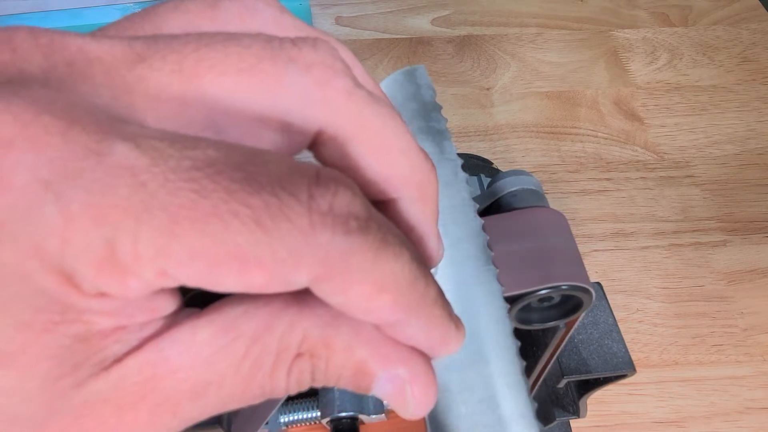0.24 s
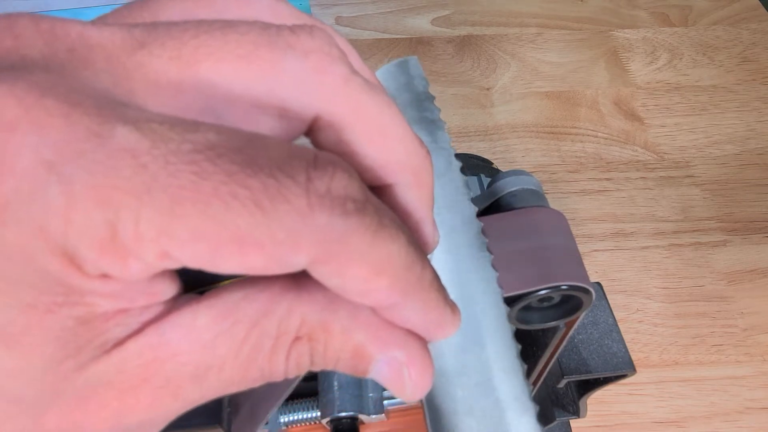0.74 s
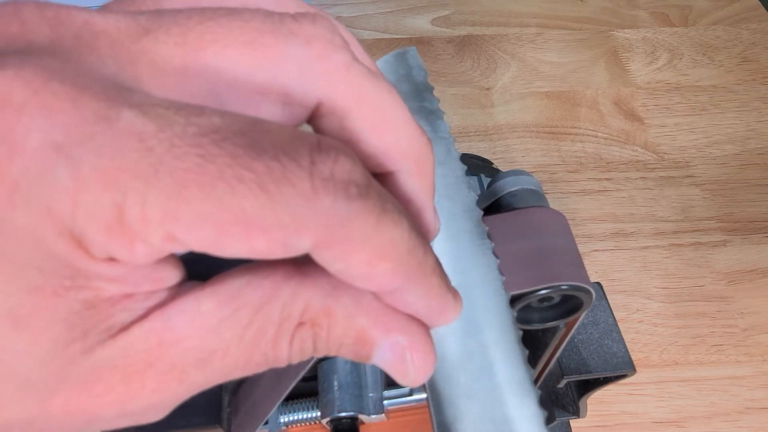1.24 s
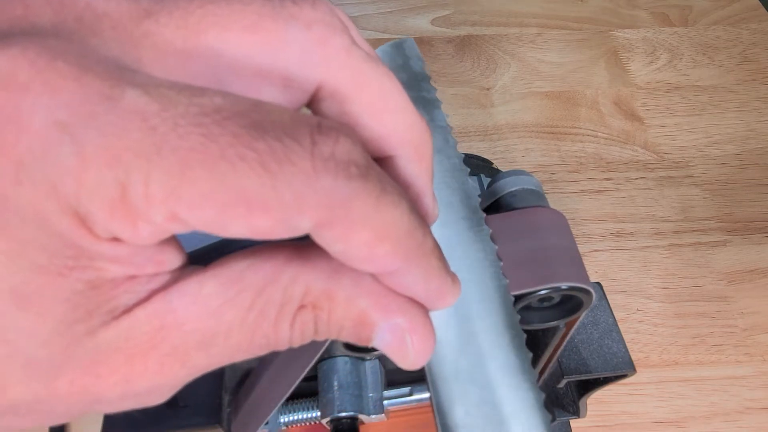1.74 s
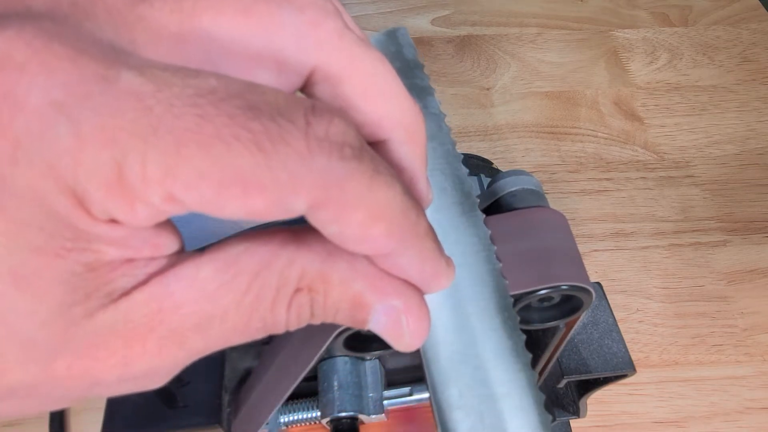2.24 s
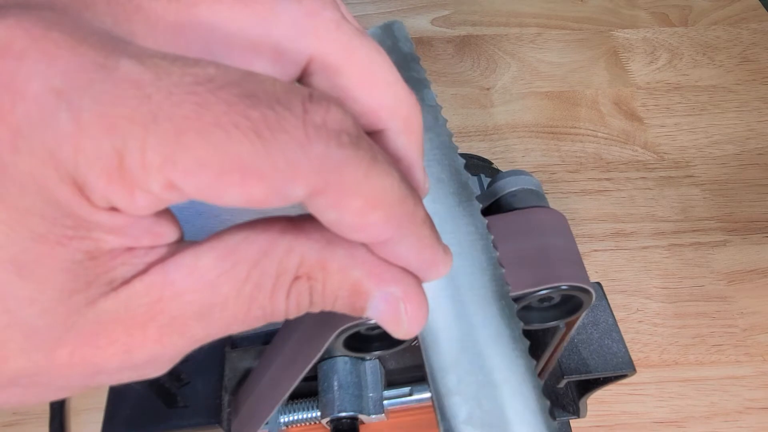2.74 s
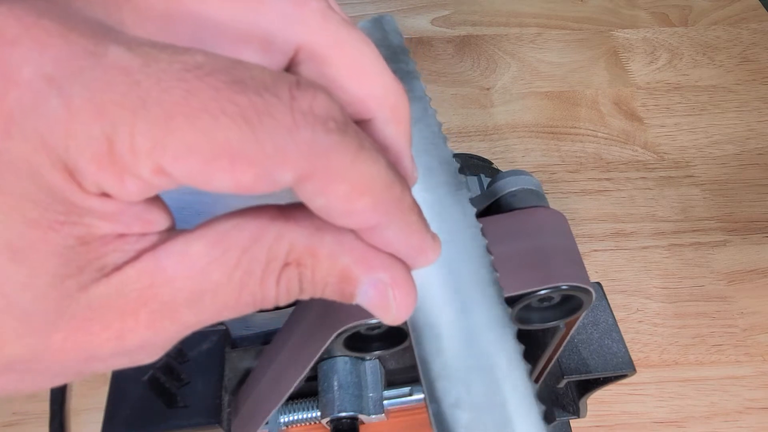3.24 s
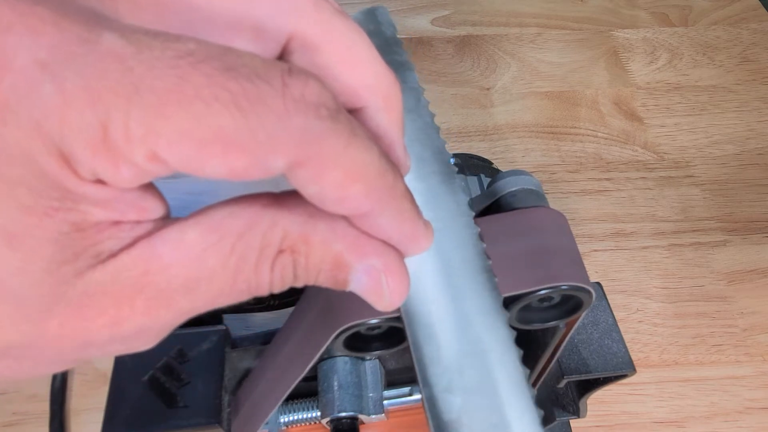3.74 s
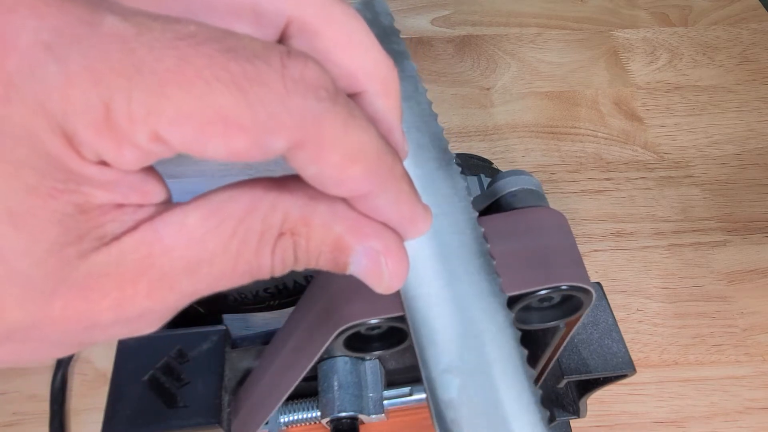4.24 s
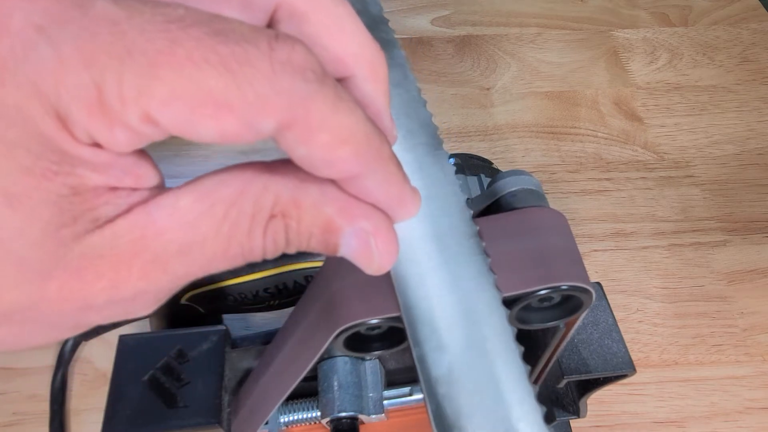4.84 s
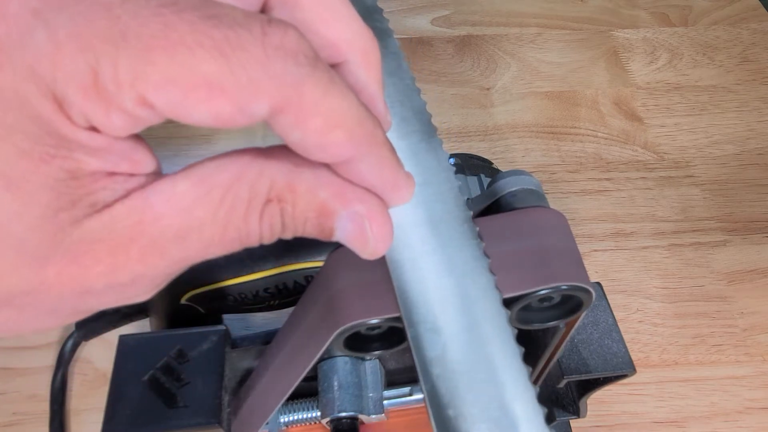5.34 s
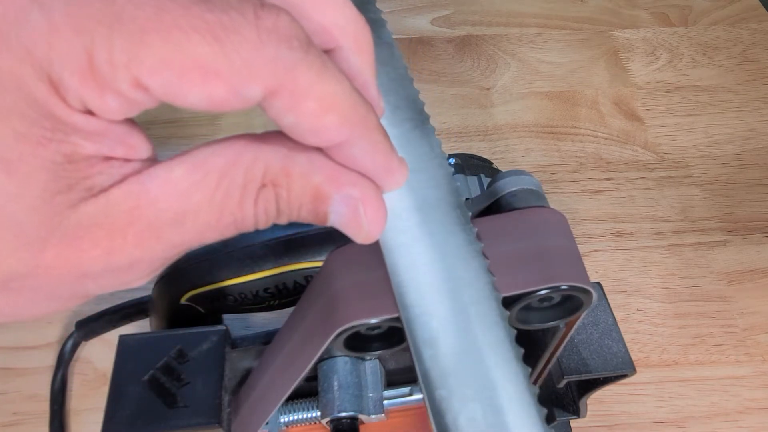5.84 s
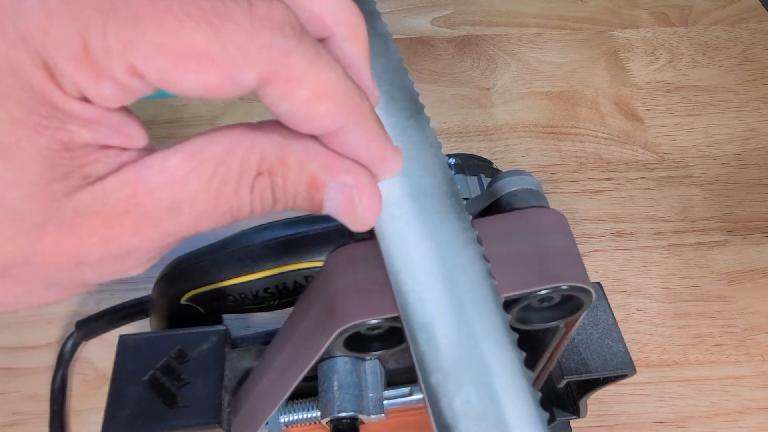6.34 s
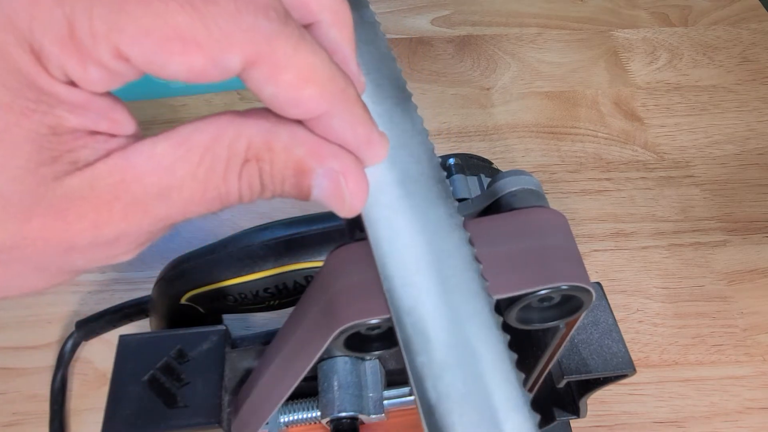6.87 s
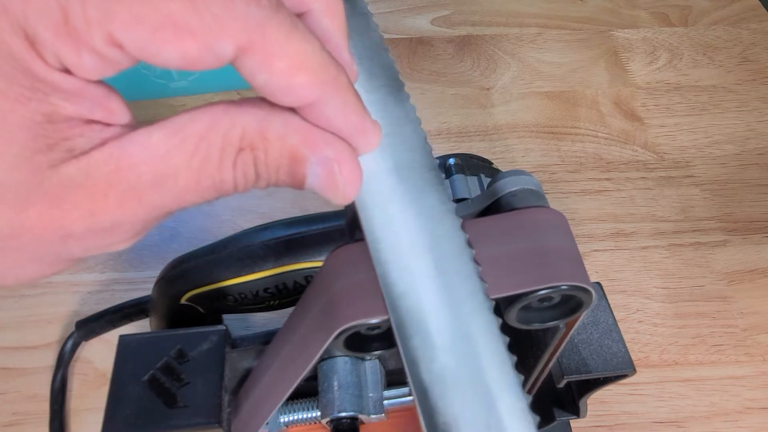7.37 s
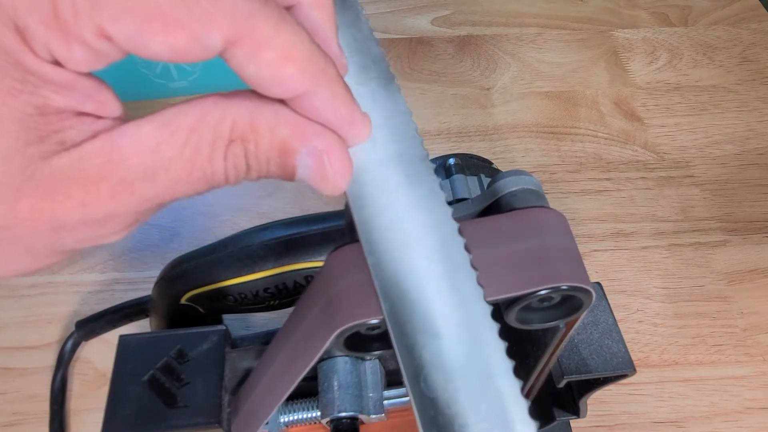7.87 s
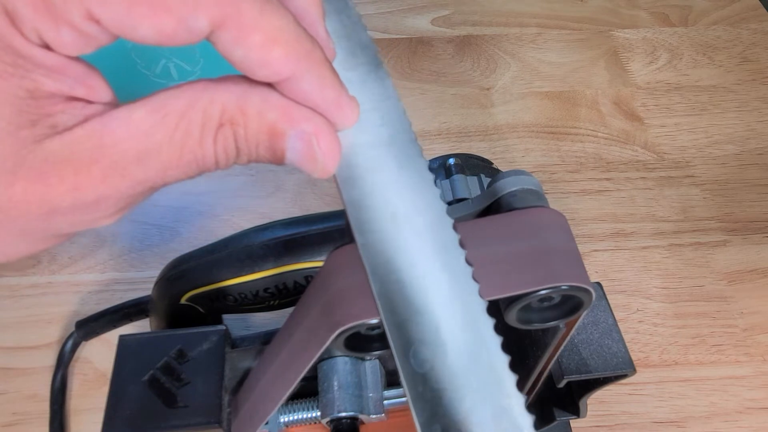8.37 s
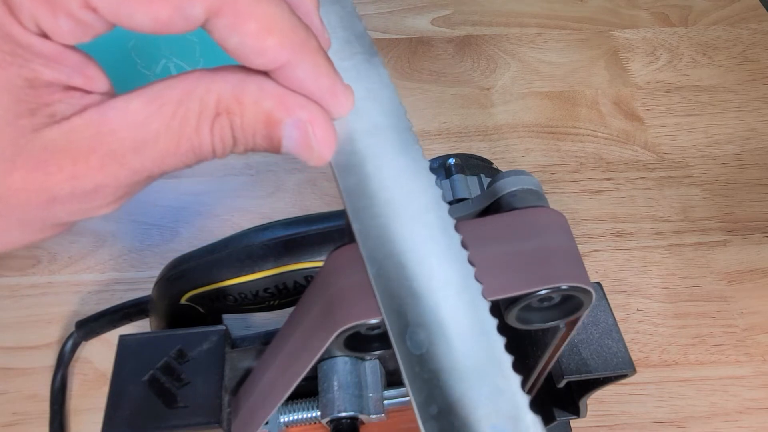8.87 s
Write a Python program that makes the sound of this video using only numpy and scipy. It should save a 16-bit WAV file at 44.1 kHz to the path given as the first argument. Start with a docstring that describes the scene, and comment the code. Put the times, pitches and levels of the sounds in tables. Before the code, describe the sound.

Close, gritty metal grinding pulses about twice a second, hissing and scraping above the constant hum, rush and rumble of a small sander.

```python
"""A serrated knife is drawn over the narrow belt of a small sander on a wooden bench, close to the left microphone.
From the start the motor hums, the frame rings, rollers and air rush, and the belt rumbles and is plucked every lap.
Grit rakes the blade from the first bite to the last: at each serration hiss swells first, then scrape, then flex.
Bright ticks of coarse grains come mostly in the first three seconds; the ringing pitches change as the contact
travels along the edge, and in the last two seconds the low flex is weaker. The right microphone lies in shadow."""
import sys
import numpy as np
from scipy import signal
from scipy.fft import rfft, irfft, next_fast_len
from scipy.io import wavfile
from scipy.ndimage import uniform_filter1d

SR = 44100
rng = np.random.default_rng(int(sys.argv[2]) if len(sys.argv) > 2 else 0)


def waveform_to_disk(signal):
    """Save audio, clipped to [-1, 1], as 16-bit WAV at the path in sys.argv[1]."""
    frames = np.transpose(np.atleast_2d(signal))
    scaled = np.clip(frames, -1, 1) * 32767
    samples = np.round(scaled).astype(np.int16)
    wavfile.write(sys.argv[1], SR, samples)


N = 401751
TIME = np.arange(N) / SR  # seconds
MAINS_HZ, LAP_S, CUTOFF_HZ = 60, .171, 15780
UNEVEN_DB, UNEVEN_PER_S = 0.37, 9.5  # chance wander of the contact in each register
TREMOR_DB, TREMOR_PER_S = .3, 34  # tremor of the whole blade on the belt

# serrations riding over the belt, timed for the scrape: bite_s (deepest), rise_s, fall_s,
# flex_db (low blade flex), scrape_db, hiss_db (at the edge)
SERRATIONS = [(-0.004, 0.12, 0.18, -23.5, -19.6, -15.5), (0.615, 0.13, 0.21, -23.5, -21, -17.0),
              (1.359, 0.209, 0.099, -24.2, -18.5, -16), (1.892, 0.15, 0.15, -26.5, -18.5, -18.5),
              (2.439, 0.14, 0.24, -23, -18.5, -17), (3.055, 0.081, 0.16, -21.8, -16.5, -17.5),
              (3.774, 0.128, 0.18, -22.5, -15.5, -17), (4.315, 0.083, 0.16, -21, -15.5, -17),
              (4.836, 0.098, 0.13, -21.5, -15.5, -17.5), (5.209, 0.079, 0.249, -21, -16, -18.5),
              (5.856, 0.1, 0.17, -22, -18, -15.9), (6.446, 0.088, 0.11, -21.5, -16, -16),
              (6.912, 0.07, 0.19, -26.7, -15, -16.5), (7.527, 0.075, 0.14, -26.8, -15, -16.0),
              (8.099, 0.094, 0.17, -29.5, -16.5, -17.5), (8.485, 0.06, 0.13, -31.3, -16, -17),
              (9.022, 0.11, 0.19, -30, -15, -16.5)]
# how flex, scrape and hiss each answer a bite: lag_s, stretch (factor on rise and fall),
# crest (exponent, 1 pointed to 2 round), rest_db (between teeth), follow (dB per dB of pressure),
# lap_db (swing each way over a belt lap), lap_peak_s (into the lap)
RESPONSES = [(0.037, 0.72, 1.2, -34.5, 1.35, .5, 0.069), (0.000067, 1.03, 1.36, -28, 1.1, 0.43, 0.092),
             (-0.066, 1.9, 2.4, -31, 1.07, 0.47, 0.12)]
# brief pressure changes, as the edge slips off a tooth or digs in: centre_s, half_length_s, pressure_db
JERKS = [(0.126, 0.054, -3.4), (0.65, 0.047, 3), (1.59, 0.034, -2), (1.925, .02, 2), (2.143, .02, -4.5),
         (2.498, .013, 1), (2.836, .022, -4.2), (3.21, .04, -4), (3.81, .013, 2.5), (4.49, .03, 3.5),
         (4.57, 0.014, -3.5), (5.058, 0.025, -3.9), (5.643, .07, -3), (5.914, 0.018, 1.5), (6.145, .05, -3),
         (6.712, .04, -2), (8.298, .02, -7), (8.488, 0.01, 1.5)]
# how the hand holds the knife: at_s, looseness (of the edge, 0-1), lean_db (on the frame)
GRIP = [(0, 0.8, 1), (1.5, 0.6, -6.5), (2.0, 0.3, -4.5), (3.5, 0.8, -3), (4.5, 0.2, -4), (6.0, 0.44, 0),
        (7.0, 0.4, 1.5), (8.2, 0.8, 1), (9.1, 0.75, -6)]
# bands of blade modes behind flex, scrape and hiss: low_hz, high_hz, gain_db
BLADE_REGISTERS = [(2000, 3300, 0.5), (3300, 9500, 0.48), (9500, 18000, 0.6)]
# blade modes: pitch_hz, width_hz, level_db (relative within the register),
# crossing_s (contact on the antinode), dwell_s (time to move off)
BLADE_MODES = [(2616, 390, -4.5, 6.4, 5.3), (2972, 360, -3.5, 7.6, 7), (3860, 930, -1.5, 2.38, 1.92),
               (4086, 320, -11.5, 6.8, 3), (5000, 590, -1, 2.5, 2.4), (5160, 800, -0.5, 6.8, 2.55),
               (5620, 210, -8, 1.2, 1.7), (6260, 430, -1.5, 6.9, 2.4), (6660, 230, -2.5, 2.3, 1.1),
               (7110, 3300, 3.5, 4.94, 5.2), (8050, 160, -4.5, 0.71, 1.3), (8055, 660, 3.5, 4.6, 3.03),
               (8370, 120, -8.5, 8.8, 1.1), (8550, 1000, 4, 3.94, 1.37), (10680, 460, -10, 1.6, 2.4),
               (11010, 290, -11.5, 6.57, .75), (11550, 82, -2.5, 3.9, 1.3), (11720, 440, -5, 5.4, 3.4),
               (12600, 150, -16, 4.9, 7.1), (12410, 250, -7.5, 0.58, 1.2), (12880, 120, -4, 3.8, 0.76),
               (12560, 370, -10, 8.5, .9), (13200, 620, 0.5, 1.4, 1.0), (13150, 5400, 5, 2.6, 1.3),
               (13340, 260, -8.5, 4.6, 3.5), (13960, 400, -6, 1.2, 1.1), (14340, 1200, -0.5, 4.43, 0.71),
               (14550, 410, -4.5, 9.25, 0.54), (14640, 1090, -5.5, 1.3, 1.8), (15400, 2600, -5, 2.2, 9.4)]
# narrow dips in the knife's spectrum: pitch_hz, width_hz, level_db
DIPS = [(3320, 270, -9), (4570, 130, -2.5), (9870, 1050, -2.5)]
# coarse grains that catch the edge: start_s, force_db (peak)
CATCHES = [(0.3034, -9), (0.4349, -2), (0.7195, -15), (0.8664, -12.5), (1.0166, -10), (1.124, -4),
           (1.4541, -13), (1.5454, -6), (2.2458, -3.5), (2.2822, -12.5), (2.9054, -6.5), (4.589, -9),
           (6.2412, -18), (7.2644, -13.5)]
# belt rumble, shape only: pitch_hz, level_db (per Hz, relative)
RUMBLE_SPECTRUM = [(25, -41), (55, -21), (88, -5.5), (110, -23), (135, -9.5), (165, -7.5), (200, 3.5),
                   (228, -2.5), (275, 0.5), (340, -2), (390, -11), (700, -14), (1200, -39)]
# resonances of the sander frame: pitch_hz, width_hz, level_db, follow (dB per dB of load)
FRAME_MODES = [(500.3, 62, -44, 1), (626.6, 32, -49.5, 0), (935.5, 24, -41, 0), (998, 28, -45, -0.5),
               (1638, 240, -38, 0.26), (1748, 55, -42.5, 0.5), (1886, 260, -32, 0.57)]
# rush of rollers and cooling air, shape only: pitch_hz, level_db (per Hz, relative)
RUSH_SPECTRUM = [(100, -12), (330, 0), (560, -0.5), (760, 5), (1030, 3), (1150, -3), (1500, 1.5),
                 (2100, -1), (2900, -1.5), (3400, -0.5), (6000, -5), (10000, -11.5), (16000, -23)]
# motor hum: harmonic (multiple of the mains frequency), level_db
HUM = [(2, -47), (3, -48), (4, -30.5), (5, -34), (6, -40), (7, -43.5), (10, -45.5), (11, -49), (13, -44),
       (14, -52), (15, -39), (16, -40), (17, -50.5), (19, -52), (20, -53), (21, -52.5)]
# unbalanced turning parts: pitch_hz, level_db
PULLEYS = [(63.6, -49), (59.5, -46.5)]
# right microphone against left: pitch_hz, shadow_db (loss), phase_rad (lag)
RIGHT_MICROPHONE = [(60.0, 2, 1), (161, 7, 0.34), (255.6, 6, 2.01), (305, 9.5, 2.2), (450.0, 7.5, 3.65),
                    (900.0, 9.5, 3.68), (1800.0, 12, 3.98), (2800.0, 14, 4.23), (5000.0, 20, 4.76),
                    (8000.0, 24, 4.3), (13000.0, 26, 4.7)]
# reflected part of the right microphone's power: pitch_hz, share (0-1)
SCATTER = [(60, .05), (160, .4), (270, .25), (500, .45), (950, .22), (2700, .33), (6000, .6), (14000, .75)]


def bite():
    """Flex, scrape and hiss levels in dB: serrations swell over a light contact; belt grit varies round its lap."""
    jerks_db = sum(db * np.exp(-((TIME - s) / length) ** 2) for s, length, db in JERKS)
    pressure_db = jerks_db + TREMOR_DB * drift(TREMOR_PER_S)
    drives_db = []
    for k, (lag, stretch, crest, rest_db, follow, lap_db, lap_peak) in enumerate(RESPONSES):
        power = from_db(rest_db) ** 2
        for s, rise, fall, *peaks_db in SERRATIONS:
            age = (TIME - s - lag) / stretch
            away = np.abs(age) / np.where(age < 0, rise, fall)
            power = power + from_db(peaks_db[k]) ** 2 * np.exp(-np.minimum(away ** crest, 20))
        lap_swing_db = lap_db * np.cos(2 * np.pi * (TIME - lap_peak) / LAP_S)
        grit_db = lap_swing_db + UNEVEN_DB * drift(UNEVEN_PER_S)
        drives_db.append(10 * np.log10(power) + follow * pressure_db + grit_db)
    return drives_db


def grit(per_s=24000, size_db=2.0, flutter_db=1.0, shake_db=5.5, snags_per_s=45, snag=1.0, snag_s=0.0026):
    """Grains strike at random; the contact flutters, is jolted once per mains cycle, and snags and lets go."""
    loose, _ = in_time(GRIP)
    sizes = from_db(size_db * np.minimum(rng.exponential(1, N), 5))
    hits = (rng.random(N) < per_s / SR) * sizes
    jolt = np.cos(np.pi * MAINS_HZ * TIME) ** 20
    # a loose edge flutters more, and is shaken by the square of its looseness
    contact_db = loose * (flutter_db * drift(97) + shake_db * loose * (jolt - jolt.mean()))
    snag_starts = (rng.random(N) < snags_per_s / SR) * rng.random(N)
    snags = fading(snag_starts, snag_s)
    return hits * from_db(contact_db) * (1 + snag * snags)


def blade(drives_db, node_db=15.0, flicker_db=1.14, register_flicker_db=0.24, deepen=0.55):
    """Each grain strikes every mode with its own strength; a mode is loudest with the contact on its antinode."""
    hits, out = grit(), np.zeros(N)
    for (low, high, gain_db), drive_db in zip(BLADE_REGISTERS, drives_db):
        rings, power = np.zeros(N), 1e-12
        bite_db = drive_db - uniform_filter1d(drive_db, SR)  # above the one-second average
        for hz, width, db, crossing, dwell in BLADE_MODES:
            if low <= hz < high:
                place_db = node_db * (np.exp(-((TIME - crossing) / dwell) ** 2) - 1)
                # a deeper bite favours the lower modes
                depth_db = -deepen * bite_db * np.log2(hz / low)
                weight = from_db(db + place_db + depth_db)
                ring = resonate(hits * rng.standard_normal(N), hz, width)
                rings += weight * rms_one(ring * from_db(flicker_db * drift(19)))
                power = power + weight ** 2
        # the weights only share the register's level among its modes
        register = rms_one(blade_echoes(rings / np.sqrt(power)))
        out += from_db(drive_db + gain_db + register_flicker_db * drift(32)) * register
    return out


def blade_echoes(x, count=4):
    """Bending waves return from tip and handle; their strengths wander slowly and ripple the spectrum."""
    out = x.copy()
    for lag in (rng.uniform(.0015, .007, count) * SR).astype(int):
        strength = .17 * np.tanh(2 * drift(.25))
        out[lag:] += strength[lag:] * x[:-lag]
    return out


def catches(decay_s=0.0011, low_hz=4500):
    """A coarse grain tears along the edge for a millisecond or so: a bright tick."""
    force = np.zeros(N)
    for s, db in CATCHES:
        force[round(s * SR)] = from_db(db)
    tear = fading(force, decay_s) * rng.standard_normal(N)
    return signal.sosfilt(signal.butter(2, low_hz, "high", fs=SR, output="sos"), tear)


def spectral_dips(x):
    """The knife's sound is weaker in a few narrow bands."""
    def dips(f):
        return from_db(sum(db / (1 + (2 * (f - hz) / width) ** 4) for hz, width, db in DIPS))
    return filtered(x, dips)


def belt(level_db=-33.5, speed_wander=.005, lap_db=0.5, pull_db=2.0):
    """The same bumps pass the rollers each lap, harder at one place and with each pull of the motor."""
    bumps = rng.standard_normal(round(LAP_S * SR))
    travel = np.cumsum(1 + speed_wander * drift(1)).astype(int)  # in samples of belt
    lap_force_db = lap_db * np.cos(2 * np.pi * travel / len(bumps))
    force = from_db(lap_force_db + pull_db * np.cos(2 * np.pi * MAINS_HZ * TIME))
    # fresh noise joins the repeating bumps
    surface = bumps[travel % len(bumps)] + .4 * rng.standard_normal(N)
    return from_db(level_db) * coloured(force * surface, RUMBLE_SPECTRUM) + splice()


def splice(level_db=-37.0, start_hz=143, glide_hz_per_s=900, rise_s=0.022, uneven_db=3.0):
    """Once a lap the splice plucks the free span of the belt, whose pitch climbs as it pulls taut again."""
    lap, age = np.divmod(TIME, LAP_S)
    # each pluck has a random strength and starting phase
    strength, start = rng.standard_normal((int(lap[-1]) + 1, 2))[lap.astype(int)].T
    swell = (age / rise_s * np.exp(1 - age / rise_s)) ** 2
    turns = start_hz * age + glide_hz_per_s * age ** 2 / 2 + start
    return from_db(level_db + uneven_db * strength) * swell * np.sqrt(2) * np.sin(2 * np.pi * turns)


def frame(scrape_db, rush_db=-27.5, rattle_db=1.22):
    """Noise-driven frame modes follow the blade's load by their own amounts; rollers and air rush; all rattle."""
    _, lean_db = in_time(GRIP)
    load_db = scrape_db - scrape_db.mean() + lean_db
    rings = 0
    for hz, width, db, follow in FRAME_MODES:
        ring = rms_one(resonate(rng.standard_normal(N), hz, width))
        rings = rings + from_db(db + follow * load_db) * ring
    rush = from_db(rush_db) * coloured(rng.standard_normal(N), RUSH_SPECTRUM)
    return (rings + rush) * rms_one(from_db(rattle_db * drift(70)))


def motor(waver_db=.5, slip_hz=0.304, dispersion_turns=.035):
    """Windings pull once per mains cycle and the frame spreads each pull in time; the pulleys throb below."""
    hum = 0
    for k, db in HUM:
        turns = round(k) * MAINS_HZ * TIME - dispersion_turns * k * k
        hum = hum + from_db(db + waver_db * drift(2.9)) * np.cos(2 * np.pi * turns)
    for hz, db in PULLEYS:
        turns = np.cumsum(hz + slip_hz * drift(1)) / SR + rng.random()
        hum = hum + from_db(db) * np.cos(2 * np.pi * turns)
    return np.sqrt(2) * hum  # table levels are RMS


def reflections(x, t60, first_s):
    """Dense echoes from the bench and walls, about as strong as their source."""
    t = np.arange(SR // 3) / SR
    tail = rng.standard_normal(len(t)) * from_db(-60 * t / t60) * (t > first_s)
    return signal.fftconvolve(x, tail / np.linalg.norm(tail))[:N]


def microphones(x, room_db=-14.5, room_t60=0.1):
    """The left microphone faces the work; the right one lies in shadow and hears more of the room."""
    def share(hz):
        return np.clip(at_hz(SCATTER, hz)[0], 0, 1)
    left = rms_one(x + from_db(room_db) * reflections(x, room_t60, first_s=0.0029)) * x.std()
    direct = filtered(left, lambda hz: np.sqrt(1 - share(hz)) * right_phase(hz))
    echoes = filtered(reflections(x, room_t60, first_s=0.0053), lambda hz: np.sqrt(share(hz)))
    return np.array([left, filtered(direct + echoes, right_shadow)])


def standing_field(x):
    """Steady tones reach the two microphones with a fixed level and phase difference."""
    return np.array([x, filtered(x, lambda hz: right_shadow(hz) * right_phase(hz))])


def right_shadow(hz):
    """Gain left at the right microphone, mostly less with rising frequency."""
    return from_db(-at_hz(RIGHT_MICROPHONE, hz)[0])


def right_phase(hz):
    """Phase lag of the right microphone as a unit complex factor."""
    return np.exp(-1j * at_hz(RIGHT_MICROPHONE, hz)[1])


def from_db(db):
    """Decibels to gain."""
    return 10 ** (np.asarray(db) / 20)


def rms_one(x):
    """Scale to unit power."""
    return x / np.sqrt(np.mean(x ** 2) + 1e-20)


def in_time(rows):
    """Each column of a curve at every sample."""
    s, *columns = np.transpose(rows)
    return [np.interp(TIME, s, c) for c in columns]


def at_hz(rows, hz):
    """Each column of a spectrum at the given frequencies, straight lines over log frequency."""
    points, *columns = np.transpose(rows)
    return [np.interp(np.log(hz), np.log(points), c) for c in columns]


def filtered(x, response):
    """Apply a response given as a function of frequency."""
    size = next_fast_len(N + 4096)
    hz = np.maximum(np.arange(size // 2 + 1) * SR / size, 1)
    return irfft(rfft(x, size) * response(hz), size)[:N]


def coloured(x, spectrum):
    """Give a white signal a spectrum; unit power."""
    return rms_one(filtered(x, lambda hz: from_db(at_hz(spectrum, hz)[0])))


def drift(rate):
    """Smooth random wander of spread 1: low-passed noise made at a twentieth of the sample rate."""
    r = np.exp(-40 * np.pi * rate / SR)
    noise = rng.standard_normal(N // 20 + 4002)
    slow = signal.lfilter([1], [1, -2 * r, r * r], noise)[4000:]  # skip the settling
    return np.interp(np.arange(N) / 20, np.arange(len(slow)), rms_one(slow))


def fading(x, decay_s):
    """Each impulse jumps up and dies away exponentially."""
    return signal.lfilter([1], [1, -np.exp(-1 / (decay_s * SR))], x + 1e-18)


def resonate(x, hz, width):
    """A steep-sided resonance: two equal pole pairs."""
    r = np.exp(-np.pi * width / SR)
    section = [(1 - r * r) / 2, 0, (r * r - 1) / 2, 1, -(1 + r * r) * np.cos(2 * np.pi * hz / SR), r * r]
    return signal.sosfilt([section, section], x + 1e-18)


def scene():
    """The knife on the belt, and the running machine behind it."""
    flex_db, scrape_db, hiss_db = bite()
    knife = spectral_dips(blade([flex_db, scrape_db, hiss_db]) + catches())
    return microphones(knife + belt() + frame(scrape_db)) + standing_field(motor())


def record(dry):
    """The highest peaks are rounded just under full scale and the top is cut steeply."""
    rounded = dry / (1 + (dry / .95) ** 6) ** (1 / 6)

    def top_cut(hz):
        return np.clip((CUTOFF_HZ - hz) / 100 + .5, 0, 1)
    return np.array([filtered(channel, top_cut) for channel in rounded])


dry = scene()
out = record(dry)
waveform_to_disk(out)
```